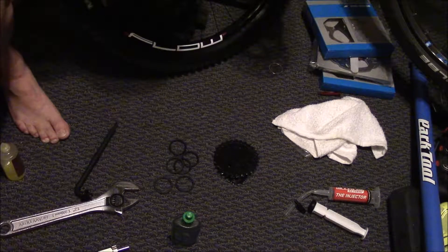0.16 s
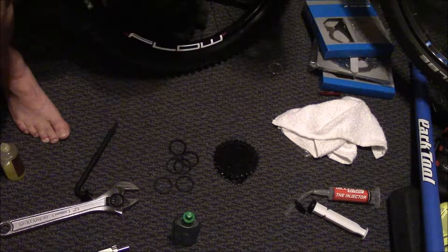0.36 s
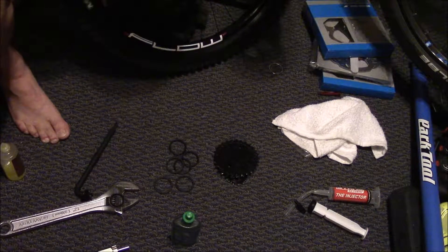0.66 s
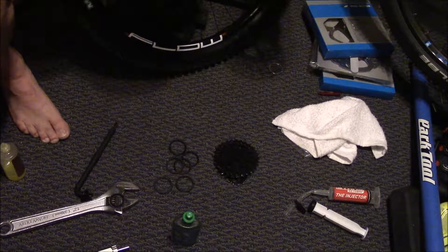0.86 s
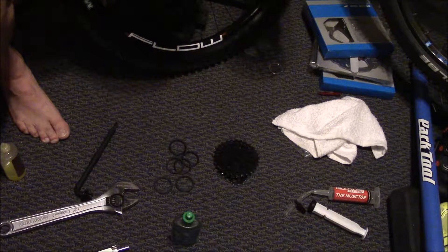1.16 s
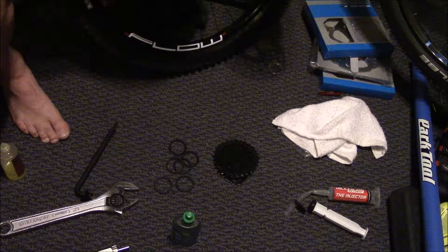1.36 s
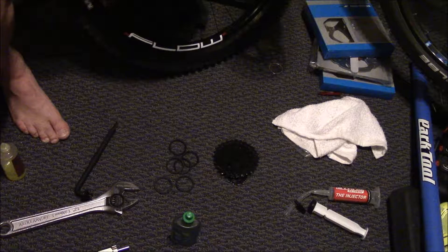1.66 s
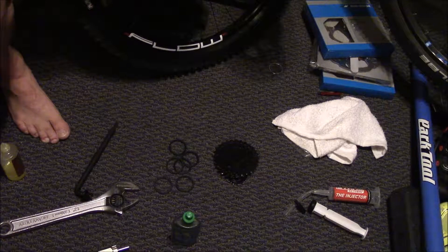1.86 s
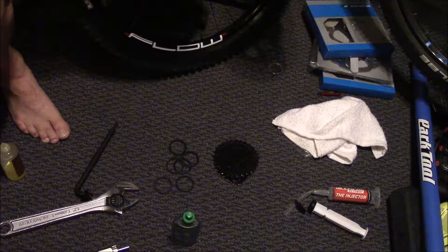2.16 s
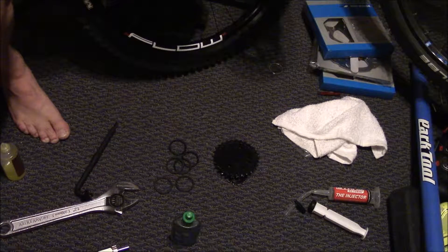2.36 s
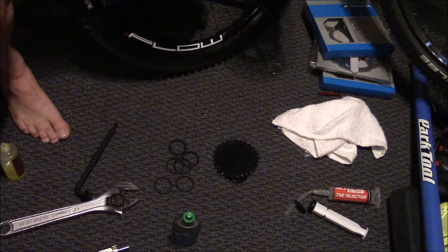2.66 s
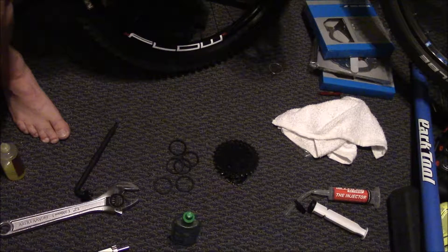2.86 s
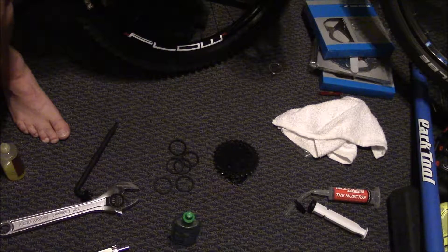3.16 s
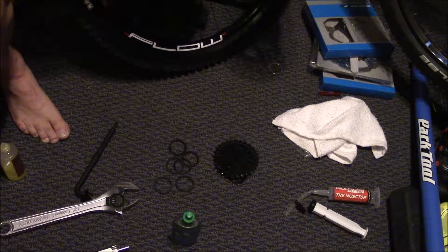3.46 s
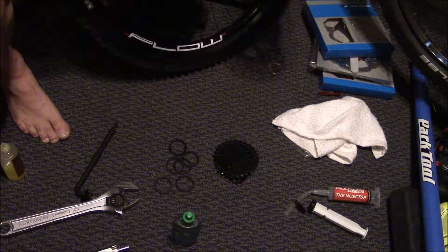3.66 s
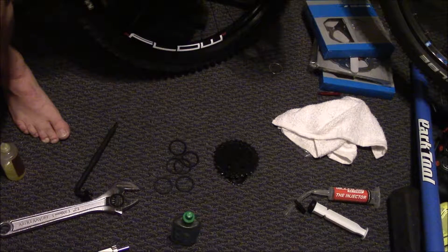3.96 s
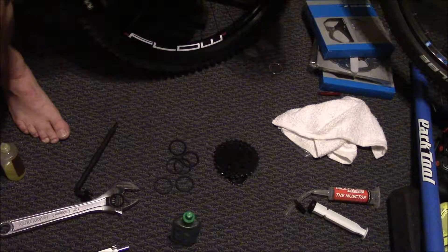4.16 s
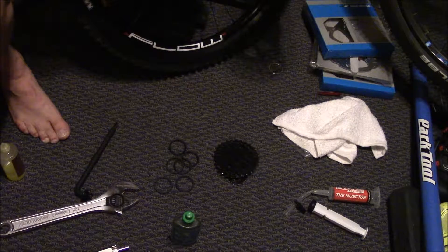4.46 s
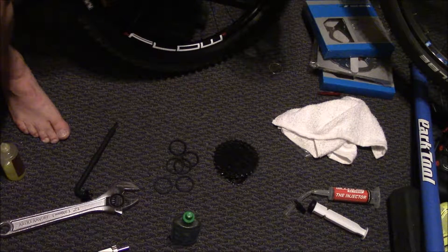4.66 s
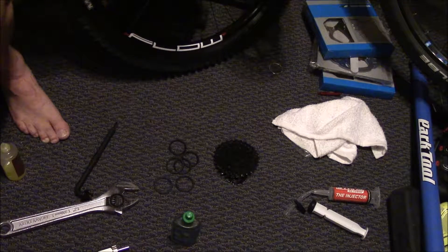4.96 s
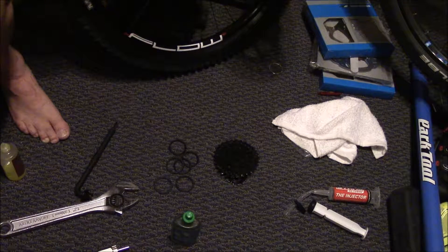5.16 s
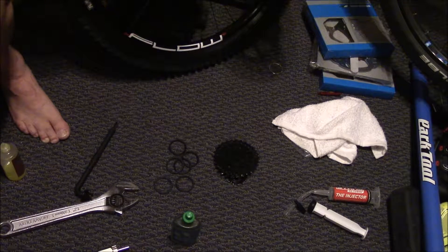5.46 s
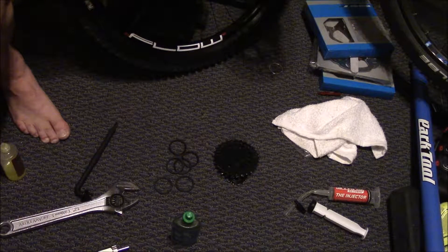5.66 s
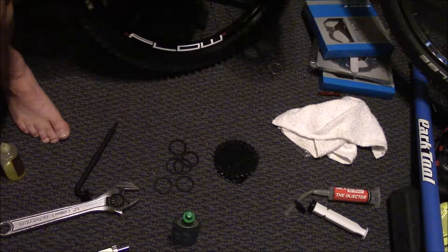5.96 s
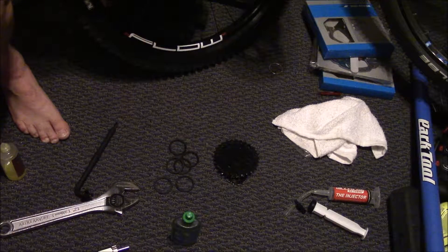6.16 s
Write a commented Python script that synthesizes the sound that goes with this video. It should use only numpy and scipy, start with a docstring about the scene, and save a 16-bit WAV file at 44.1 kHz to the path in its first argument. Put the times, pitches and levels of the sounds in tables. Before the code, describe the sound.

In a small room with a low steady hum, a faint hiss fades right away. Then a nearby bicycle freehub starts ratcheting in quick little spurts, each a handful of crisp clicks with a slight steel ring and very little echo. Soft low bumps lie beneath the early spurts. The ratcheting finally slows to separate, irregular ticks.

```python
"""A small carpeted room, with a stereo microphone on a bicycle freehub turned by hand in short bursts.
At each tooth three pawls snap down almost together and ring the hub and axle; a weak drop gives only
a dull tick. The room answers briefly. Behind it lies a steady hum, with a few soft low bumps and,
at first, a faint hiss."""
import sys
import numpy as np
from scipy import signal
from scipy.fft import rfft, irfft
from scipy.io import wavfile

SR = 44100
rng = np.random.default_rng(int(sys.argv[2]) if len(sys.argv) > 2 else 0)


def transcribe(u):
    """Save the signal u as a 16-bit wav file named by the first command-line argument.

    u: samples, shape (n,) or (channels, n), limited to [-1, 1]; the rate is SR.
    q: integer samples, one column per channel.
    """
    v = np.clip(np.atleast_2d(u).T, -1, 1)
    q = np.round(v * 32767).astype(np.int16)
    wavfile.write(sys.argv[1], SR, q)


N = 278529
SIDE_SIGN = np.array([[1], [-1]])  # the side signal adds on the left and subtracts on the right


def undb(db):
    """Decibels to gain."""
    return 10 ** (np.asarray(db) / 20)


def unit(x):
    """Scale to rms 1."""
    return x / np.sqrt(np.mean(x ** 2))


def colour(x, spectrum):
    """Filter by (Hz, dB) points joined on a log-frequency axis."""
    points_hz, points_db = np.array(spectrum, float).T
    hz = np.fft.rfftfreq(x.shape[-1], 1 / SR)
    db = np.interp(np.log(hz + 1e-9), np.log(points_hz), points_db)
    return irfft(rfft(x) * undb(db), x.shape[-1])


def noise(shape, spectrum):
    """Coloured noise of rms 1."""
    return unit(colour(rng.standard_normal(shape), spectrum))


def fade(t, t60):
    """Exponential decay, 60 dB in t60 seconds."""
    return np.exp(-np.log(1000) * t / t60)


def add(out, sound, start_s):
    """Mix a sound in from start_s on."""
    part = out[..., max(int(start_s * SR), 0):]
    part[..., :sound.shape[-1]] += sound[..., :part.shape[-1]]


# The room tone. Each row: frequency in Hz, relative noise density in dB.
AIR_SPECTRUM = [(20, -62.5), (45, -17.5), (85, -11), (200, -0.5), (270, -3.5), (410, 1), (580, -7),
                (800, -16.5), (1150, -14), (1900, -26), (3500, -32), (7000, -38.5), (11000, -45),
                (15500, -50)]
# Its width at the microphone. Each row: frequency in Hz, side against mid in dB.
AIR_WIDTH = [(60, -3), (110, -9), (200, -17.5), (380, -25.5), (700, -16), (1290, -17.5), (2380, -12.5),
             (4400, -11), (8120, -10), (15000, -18.5)]
# The tones of the hum. Each row: centre in Hz, width in Hz, level in dB.
HUM_TONES = [(119.7, 3.1, -60.5), (175, 4.4, -59.5), (222.8, 6.8, -51.5), (303, 6.4, -59.5),
             (362.6, 24, -46.5), (453, 1.3, -72), (521, 4.1, -62), (586.4, 16, -56)]

def hum(air_db=-41.5):
    """A steady rush of air, wide in the deep bass, with narrow bands of noise that waver as tones."""
    air_mid = undb(air_db) * noise(N, AIR_SPECTRUM)
    air_side = undb(air_db) * colour(noise(N, AIR_SPECTRUM), AIR_WIDTH)
    hz = np.fft.rfftfreq(N, 1 / SR)
    peaks = sum(undb(db) * unit(1 / (1 + (2 * (hz - centre) / width) ** 2))
                for centre, width, db in HUM_TONES)
    tones = irfft(peaks * rfft(rng.standard_normal(N)), N)
    return air_mid + tones + air_side * SIDE_SIGN


# Soft low bumps in the background. Each row: peak time in seconds, length in seconds, level in dB.
BUMP_SWELLS = [(1.03, 0.058, -46), (1.081, 0.051, -38), (1.433, 0.054, -42), (1.667, 0.061, -40),
               (1.804, 0.12, -43.5), (2.271, 0.046, -36), (2.402, 0.13, -40), (2.487, 0.035, -33.5),
               (4.66, .04, -45), (4.92, 0.025, -48)]
# Their rumble. Each row: frequency in Hz, relative noise density in dB.
BUMP_SPECTRUM = [(25, -26), (60, -1), (95, 10.5), (180, 10.5), (260, 7), (600, -50)]

def bumps(side_db=-5, pan_db=-2):
    """Short swells of low rumble, a little to the right of the microphone."""
    t = np.arange(N) / SR
    swell = sum(undb(db) * np.exp(-(2 * (t - peak_s) / length_s) ** 2)
                for peak_s, length_s, db in BUMP_SWELLS)
    mid, side = noise((2, N), BUMP_SPECTRUM)
    return swell * (mid + undb(side_db) * side * SIDE_SIGN) * undb(pan_db * SIDE_SIGN)


# A faint hiss, dead centre. Each row: frequency in Hz, relative noise density in dB.
HISS_SPECTRUM = [(1200, -22), (3000, -3), (6000, -5), (11000, -6), (13500, -10), (15500, -21)]

def hiss(level_db=-59, end_s=0.28, release_s=0.089):
    """A smooth hiss, perhaps something sliding, that holds and then dies away."""
    envelope = np.clip((end_s - np.arange(N) / SR) / release_s, 0, 1)
    return undb(level_db) * envelope * noise(N, HISS_SPECTRUM)


# The carpeted room's answer. Each row: band centre in Hz, gain in dB, time to fall 60 dB in seconds,
# side against mid in dB.
ROOM_BANDS = [(500, 8, 0.5, -27), (1210, 6, 0.42, -54), (1980, 8, 0.32, -54), (3460, -3, 0.33, -46),
              (5300, -5, 0.24, -38), (8130, -3, 0.3, -12.5), (8640, 1.5, 0.31, -9.5), (8740, -4, 0.28, -14),
              (11200, -11, 0.27, -10), (12600, -12.5, 0.27, -22), (14800, -12, 0.2, -30)]

def room(click, first_s=0.0011, build_s=0.001, samples=12288):
    """Dense reflections, new for each position of the hub; they die sooner and are wider in the treble."""
    t, hz = np.arange(samples) / SR, np.fft.rfftfreq(samples, 1 / SR)
    reflections = rfft(rng.standard_normal((2, samples)))
    log_centres = np.log([row[0] for row in ROOM_BANDS])
    onset = 1 - np.exp(-np.maximum(t - first_s, 0) / build_s)
    tail = 0
    for share, (_, db, t60, side_db) in zip(np.eye(len(ROOM_BANDS)), ROOM_BANDS):
        band = irfft(reflections * np.interp(np.log(hz + 1), log_centres, share), samples)
        envelope = fade(t, t60) * onset
        tail += undb([[db], [db + side_db]]) * band * envelope / np.linalg.norm(envelope)
    mid, side = signal.fftconvolve(click[None], tail, axes=1)
    return mid + side * SIDE_SIGN


# The modes of hub shell, axle and sprockets. Each row: frequency in Hz, relative energy in dB,
# time to fall 60 dB in seconds.
HUB_RESONANCES = [(1012, -12, .04), (1620, -16, .04), (1860, -10, .06), (1985, -11, .06), (2810, -4, .035),
                  (3040, -9, .035), (3260, -9, .03), (3424, -2, .085), (3500, -4, .03), (3757, -15, .2),
                  (3905, -8, .1), (4155, -3.5, .028), (4430, -6, .035), (4820, -9, .03), (5965, -3, .06),
                  (6950, -3.5, .05), (7130, -2.5, .05), (7330, -7, .04), (8260, 4, .08), (8410, 2.5, .09),
                  (8560, -5, .13), (8760, -4, .07), (8870, -3, .06), (9065, 4, .09), (9890, -1, .025),
                  (10028, 3.5, .028), (10840, -5, .03), (11140, -3.5, .06), (11340, -6, .07),
                  (14150, -5, .02)]

def hub_ring(t, scatter_db=1.5, detune=0.0019, rise_s=0.00064):
    """The pawls meet the hub at a new place each time, so each click rings a little differently."""
    hz, db, t60 = np.array(HUB_RESONANCES).T[:, :, None]
    level_draw, pitch_draw = rng.standard_normal((2,) + hz.shape)
    amplitude = undb(db + scatter_db * level_draw) * np.sqrt(2 / t60)
    cycles = hz * (1 + detune * pitch_draw) * t + rng.random(hz.shape)
    modes = amplitude * fade(t, t60) * np.sin(2 * np.pi * cycles)
    return modes.sum(axis=0) * (1 - np.exp(-t / rise_s))


# The steel's dense, quickly damped modes. Each row: frequency in Hz, relative noise density in dB.
CRACK_SPECTRUM = [(400, -24.5), (800, -38), (1100, -11.5), (1900, -5), (2400, -11), (3200, 3), (4300, 4.5),
                  (5200, -1.5), (6500, 5.5), (7500, 8), (9400, 5.5), (11200, 7), (12400, 6), (14600, 4)]

def pawl_drop(t, lag_s=0.00076, pawl_db=(-9, 0, -7), crack_t60=0.036, snap_t60=0.0072, snap_db=5):
    """Three pawls land within 2 ms; the steel cracks and rings, towards the microphone and all round."""
    delays = lag_s * (np.arange(3) + rng.random(3) / 2)
    envelope = (fade(t, crack_t60) + undb(snap_db) * fade(t, snap_t60)) / np.sqrt(crack_t60)
    crack, ring = np.zeros((2, len(t)))
    for delay, db in zip(delays, pawl_db):
        add(crack, undb(db) * envelope * noise(len(t), CRACK_SPECTRUM), delay)
    add(ring, hub_ring(t), delays[1])
    # single modes stand out in one direction; summed over all directions they blend into the crack
    direct = crack + undb(-9) * ring
    all_round = crack + undb(-19) * ring
    return np.array([direct, all_round])


# The pawls dropping off a tooth as the hand turns the hub. Each row: time in seconds, strength in dB.
TOOTH_DROPS = [(0.1758, -67), (1.2145, -15.5), (1.266, -17.5), (1.3539, -18), (1.5609, -44), (1.7699, -16),
               (1.7922, -14), (1.8187, -15), (1.8477, -13.5), (1.8767, -15.5), (1.9036, -16.5),
               (1.9427, -13.5), (2.4131, -16.5), (2.4793, -15), (2.53, -15.5), (2.598, -14.5),
               (2.6355, -15), (2.6851, -15.5), (2.819, -33), (3.0643, -15.5), (3.0978, -15), (3.1221, -14),
               (3.1436, -14.5), (3.1682, -14.5), (3.1919, -15.5), (3.2211, -14), (3.5745, -15.5),
               (3.6107, -15), (3.6467, -15), (3.688, -15.5), (3.7259, -16), (3.7763, -14), (3.8766, -47),
               (4.2033, -17), (4.2529, -16.5), (4.2983, -16), (4.3377, -17), (4.3847, -15.5), (4.4741, -16),
               (5.1499, -14.5), (5.3427, -16), (5.4828, -15), (5.664, -15.5), (5.7357, -18.5),
               (5.7855, -16), (5.886, -16)]
# The direct snap at the microphone; a weak drop loses its treble first. Each row: lower and upper edge
# in Hz, level of a full snap in dB, dB lost per dB of strength.
SNAP_SPECTRUM = [(400, 2760, -39.5, 0.7), (2700, 5680, -33, 0.47), (5510, 11320, -27, 1),
                 (11230, 18700, -28.5, 1.1)]

def freehub(full_snap_db=-15, scatter_db=0.75, lead_s=0.0006, left_early_s=3.7e-6):
    """The spring gives every tooth much the same snap; half-caught pawls land with only a dull tick."""
    out, t = np.zeros((2, N)), np.arange(6144) / SR
    attack = SR // 100  # the first 10 ms set each band's level
    bands = [signal.butter(4, row[:2], "band", fs=SR, output="sos") for row in SNAP_SPECTRUM]
    full_db, slope = np.array(SNAP_SPECTRUM).T[2:]
    for time_s, strength_db in TOOTH_DROPS:
        levels_db = full_db + slope * (strength_db - full_snap_db)
        levels_db += scatter_db * rng.standard_normal(len(bands))
        blow, click = pawl_drop(t), 0
        for band, db in zip(bands, levels_db):
            part = signal.sosfiltfilt(band, blow, padtype=None)
            click += part * undb(db) / np.std(part[0, :attack])
        direct, all_round = click
        # the direct snap reaches the microphone's left port slightly sooner
        side = left_early_s / 2 * SR * np.gradient(direct)
        add(out, direct + side * SIDE_SIGN, time_s - lead_s)
        add(out, room(all_round), time_s - lead_s)
    return out


def scene():
    """At the microphone: the freehub in its room, over hum, bumps and hiss."""
    return freehub() + hum() + bumps() + hiss()


def record(dry, rolloff_hz=15600, cutoff_hz=15900):
    """The microphone rolls off in the highest treble and the recorder cuts the rest."""
    microphone = signal.butter(4, rolloff_hz, fs=SR, output="sos")
    recorder = signal.ellip(8, 0.2, 80, cutoff_hz, fs=SR, output="sos")
    return signal.sosfilt(recorder, signal.sosfiltfilt(microphone, dry))


dry = scene()
out = record(dry)
transcribe(out)
```